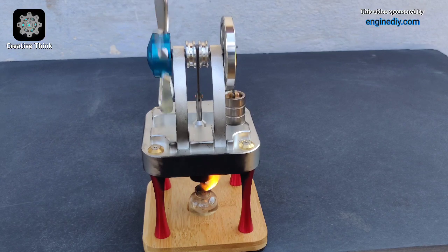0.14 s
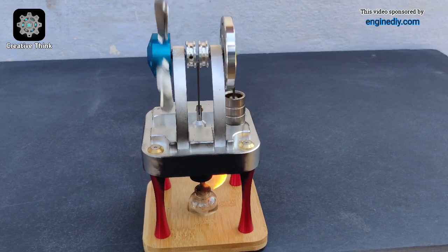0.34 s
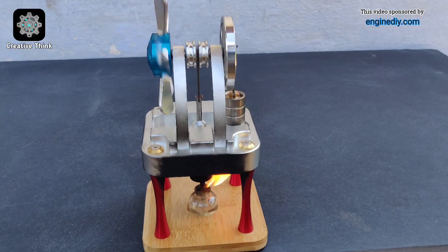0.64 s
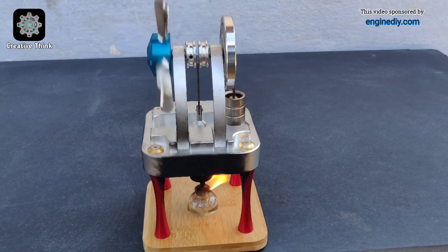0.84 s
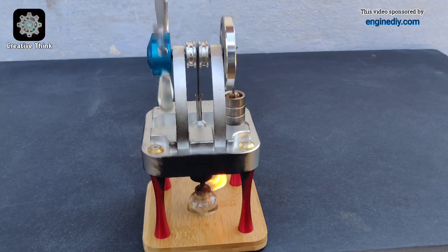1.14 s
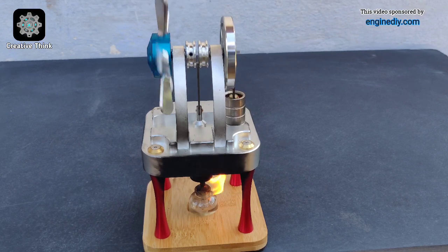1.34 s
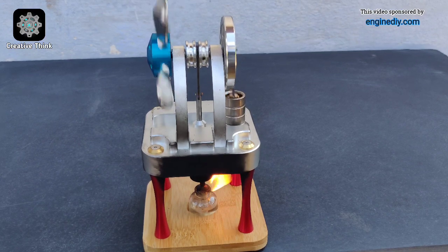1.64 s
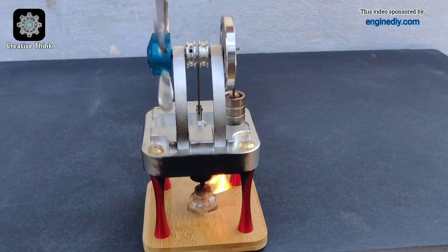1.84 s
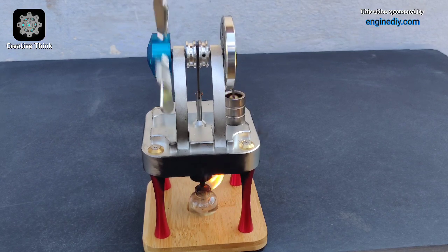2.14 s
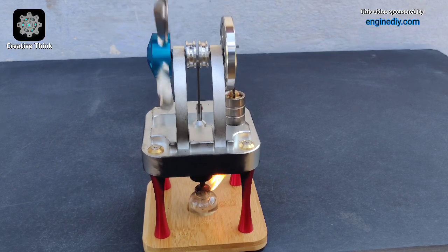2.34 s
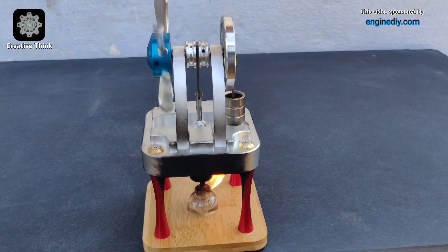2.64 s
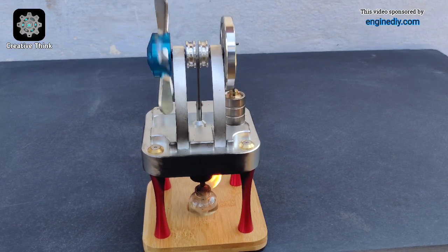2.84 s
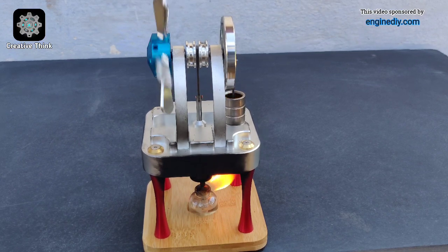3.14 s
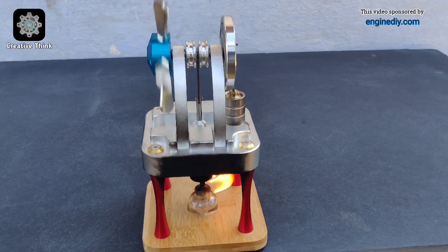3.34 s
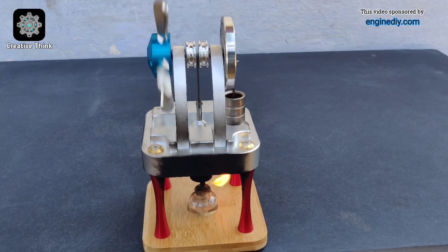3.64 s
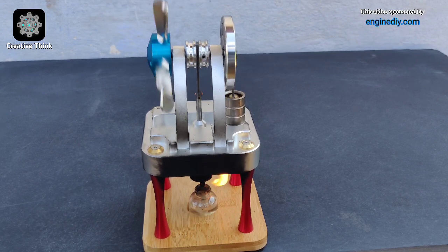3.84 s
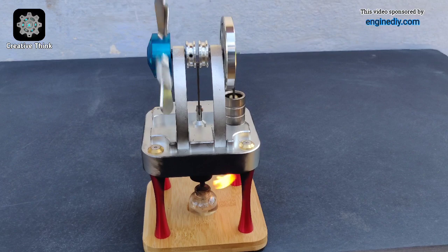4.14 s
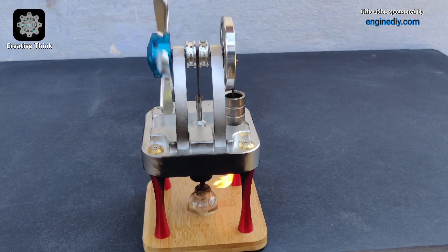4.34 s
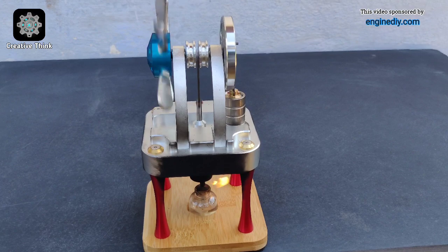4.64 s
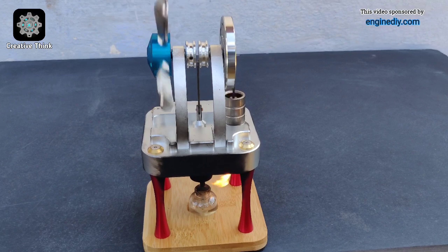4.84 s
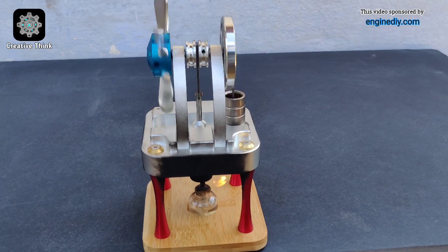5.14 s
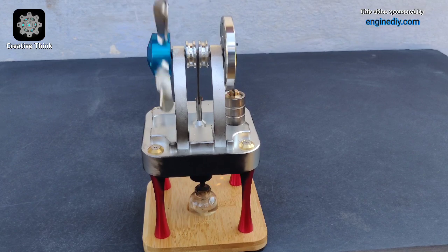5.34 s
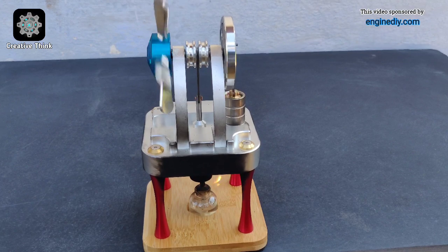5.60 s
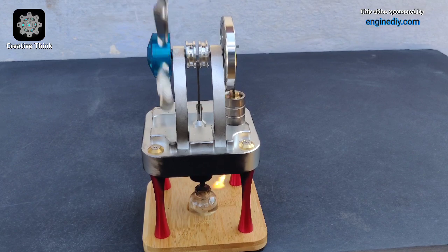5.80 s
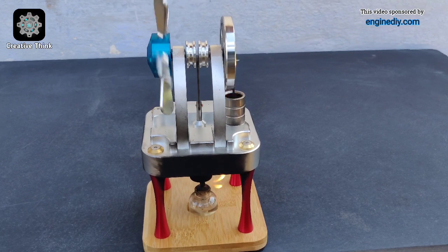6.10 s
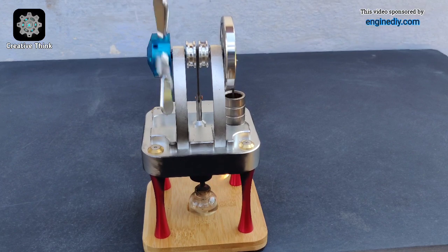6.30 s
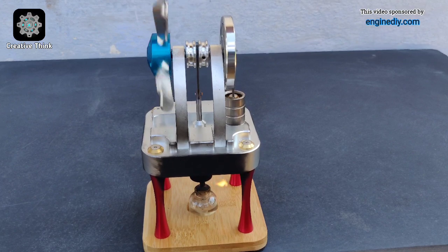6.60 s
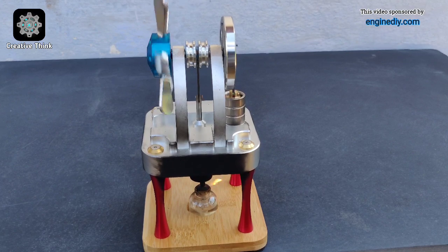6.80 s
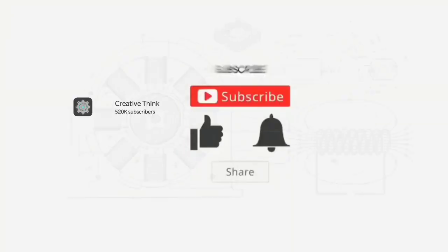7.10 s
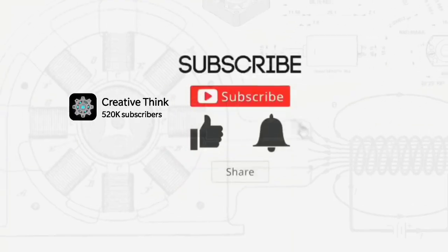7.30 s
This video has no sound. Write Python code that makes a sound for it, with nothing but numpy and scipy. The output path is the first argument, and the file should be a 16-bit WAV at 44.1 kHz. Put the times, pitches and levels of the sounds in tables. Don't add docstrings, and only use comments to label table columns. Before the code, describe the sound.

A small metal model engine clatters fast and evenly close by, slowing slightly, as wind starts buffeting the microphone before everything cuts off abruptly.

```python
import sys
import numpy as np
from scipy import signal
from scipy.fft import rfft, irfft, next_fast_len
from scipy.io import wavfile
from scipy.ndimage import uniform_filter1d

SR = 44100
rng = np.random.default_rng(int(sys.argv[2]) if len(sys.argv) > 2 else 0)


def boost_factor(decibels):
    exponent = np.asarray(decibels, float) / 20
    return 10 ** exponent


def master(y):
    cut = np.clip(np.atleast_2d(y).T, -1, 1)
    pcm = np.round(cut * 32767)
    wavfile.write(sys.argv[1], SR, pcm.astype(np.int16))


N = 328972
END_S = 6.9222


def unit(x):
    return x / np.sqrt(np.mean(x ** 2))


def curve(table, axis):
    rows = np.array(table)
    return np.interp(np.arange(N) / SR, rows[:, 0], rows[:, axis])


def colour(x, table, axis):
    rows, size = np.array(table), next_fast_len(N)
    hz = np.arange(size // 2 + 1) * SR / size + 1
    gain_db = np.interp(np.log(hz), np.log(rows[:, 0]), rows[:, axis])
    return irfft(rfft(x, size) * boost_factor(gain_db), size)[:N]


def ring(x, hz, t60):
    radius = np.exp(-np.log(1000) / (t60 * SR))
    return signal.lfilter([2 * (1 - radius)], [1, -radius * np.exp(2j * np.pi * hz / SR)], x)


def walk(rate):
    hold = int(SR / rate)
    steps = np.repeat(rng.standard_normal(N // hold + 1), hold)
    return unit(uniform_filter1d(uniform_filter1d(steps, hold), hold)[:N])


# [f/Hz, left level/dB, right level/dB]
HISS_SPECTRUM = [(299.5, -19.5, -16), (594, -16.5, -21), (1300, -19.5, -21), (2000, -24, -27),
                 (3350, -22.5, -24.5), (4130, -9.5, -14.5), (5130, -20.5, -26.5), (5930, -3, -14),
                 (6850, -11, -23), (8600, -36.5, -26), (9800, -51, -46), (11300, -48, -47),
                 (13050, -44.5, -40.5), (14200, -39.5, -37), (15400, -35.5, -35.5), (16200, -75, -75)]
# [f/Hz, level/dB rms, width/Hz, right minus left/dB]
FAR_TONES = [(45.5, -51, 4.1, -3), (84.8, -53.5, 4.7, 0), (111, -54.5, 4, -0.5), (406.3, -71.5, 3, 1.5),
             (484, -84.5, 4, -2), (13744, -73, 5, 11.5), (14080, -73, 5, 9), (14150, -72.5, 5, 7.5)]
# [t/s, level/dB]
WHINE_SWELL = [(0, 0), (1.9, -.7), (2.2, 4), (2.8, 1.5), (3.0, -1.5), (4.4, 0), (4.6, 3), (4.85, -3.5),
               (5.1, 0.5), (5.5, -1.5), (6.92, -3)]


def surroundings():
    common, left, right = rng.standard_normal((3, N))
    bass = signal.sosfilt(signal.butter(1, 1500, fs=SR, output="sos"), common)
    hiss = [colour(own + 1.35 * bass, HISS_SPECTRUM, axis=k + 1) for k, own in enumerate((left, right))]
    out = boost_factor(-27.0) * np.array(hiss)
    for hz, db, width, right_db in FAR_TONES:
        swell_db = curve(WHINE_SWELL, axis=1) * (hz > 10000)
        tone = unit(ring(rng.standard_normal(N), hz, 2.0 / width).imag)
        out += boost_factor(db + swell_db) * tone * boost_factor([[-right_db / 2], [right_db / 2]])
    return out


# [t/s, level/dB]
BREEZE_LEVEL = [
    (0.0, -62),
    (2.4, -58),
    (3.4, -42),
    (4.3, -42),
    (5.2, -43.5),
    (5.6, -33),
    (6.1, -32.5),
    (6.5, -32),
    (6.92, -29.5),
]
# [t/s, level above the breeze/dB, length/s]
GUST_EVENTS = [
    [(3.78, 5.5, .1), (4.14, 2.5, 0.16), (4.92, 4, 0.1), (5.43, 3, 0.059), (5.65, 2, 0.08), (5.995, 5.5, 0.014), (6.09, 4, 0.046), (6.2, 5, 0.087), (6.335, 5, 0.018), (6.41, -5.5, .04), (6.635, 5, 0.031), (6.73, -4, 0.022), (6.84, -1.5, .05)],
    [(4.75, 5.5, 0.079), (5.8, 4.5, 0.056), (6.09, 3, .05), (6.33, 6, .06), (6.6, 5.5, .09), (6.79, 3.5, 0.05), (6.86, 6, 0.04)],
]
# [f/Hz, level/dB per Hz]
BUFFET_SPECTRUM = [(5.9, -30.5), (10, 3), (27, 3.5), (62, -3), (134, -18), (160, -15), (449, -44),
                   (700, -40), (910, -75), (1540, -120)]
# [f/Hz, level/dB per Hz]
RUSH_SPECTRUM = [(120, -27.5), (220, 0), (350, -8.5), (600, -18.5), (1000, -42)]


def breeze():
    out, t = [], np.arange(N) / SR
    for table, side_db in zip(GUST_EVENTS, (8.5, 0)):
        gust_db = sum(db * np.exp(-((t - s) / length) ** 2) for s, db, length in table)
        air = unit(colour(boost_factor(3.0 * walk(25)) * rng.standard_normal(N), BUFFET_SPECTRUM, axis=1))
        rush = unit(colour(boost_factor(5.6 * walk(70)) * rng.standard_normal(N), RUSH_SPECTRUM, axis=1))
        wind = boost_factor(gust_db) * air + boost_factor(-29.5 + 2.2 * gust_db) * rush
        out.append(boost_factor(curve(BREEZE_LEVEL, axis=1) + side_db) * wind)
    return np.array(out)


# [t/s, peak level/dB, width/ms (negative for a pull)]
EDDIES = [
    [(5.441, -10.5, 7.5), (5.638, -10.5, -8), (5.955, -17, -17), (6.012, -15, -2), (6.027, -8, 16.5), (6.06, -13.5, -3.5), (6.073, -15.5, -2), (6.094, -16, 3), (6.11, -8.5, -10), (6.146, -12.5, 3.5), (6.168, -10, 4.5), (6.19, -17, -3.5), (6.209, -10, 4), (6.285, -14, 3.5), (6.316, -5.5, 5), (6.331, -14, -3), (6.342, -16, 2.5), (6.454, -17, -5), (6.617, -15, 5), (6.633, -11, -2), (6.649, -11, -4), (6.668, -20, 2.5), (6.76, -8.5, 5), (6.69, -16.5, 8), (6.833, -13, 6), (6.846, -13.5, -8), (6.902, -18, -3.5)],
    [(5.811, -24, 3), (6.323, -21, -9), (6.336, -23, 5.7), (6.783, -22, -4.5), (6.8, -14, 5), (6.914, -18.5, 2.5)],
]


def puffs():
    out, t = np.zeros((2, N)), np.arange(N) / SR
    for port, table in enumerate(EDDIES):
        for s, db, ms in table:
            near = slice(int((s - .06) * SR), int((s + .06) * SR))
            u = (t[near] - s) / (1.17 * ms / 1000)
            point = 1.57 * np.exp(-3.0 * (u * u + 0.018) ** 0.8)
            dips = 0.23 * np.exp(-.3 * u * u)
            out[port, near] += np.sign(ms) * boost_factor(db) * (point - dips)
    return out


# [t/s, rate/turns per s]
CRANK_SPEED = [
    (.005, 12.134),
    (1.005, 11.9327),
    (2.005, 11.9006),
    (3.005, 11.8252),
    (4.005, 11.6292),
    (5.005, 11.4123),
    (6.005, 11.0056),
    (7.005, 10.5078),
]


def crank():
    first_knock_s = .0142
    return 1 + np.cumsum(curve(CRANK_SPEED, axis=1)) / SR - first_knock_s * CRANK_SPEED[0][1]


# [t/s, level/dB]
WHISTLE_LEVEL = [
    (0.0, -45.5),
    (3.5, -49),
    (6.92, -50.5),
]
# [f/Hz, width/Hz, level/dB]
CAVITIES = [(931.2, 12.2, -2), (951.8, 17, -5.5), (1012.5, 19, -11)]


def whistle(turns):
    reversal_turn, reversal_width, reversal_db = .61, 0.21, -6.5
    flow = boost_factor(reversal_db * np.exp(-((turns % 1 - reversal_turn) / reversal_width) ** 2))
    air = np.zeros(N)
    for hz, width, db in CAVITIES:
        t60 = 1.5 / width
        air += boost_factor(db) * unit(ring(ring(rng.standard_normal(N), hz, t60), hz, t60).imag)
    steady = unit(air / uniform_filter1d(air ** 2, int(.12 * SR)) ** 0.34)
    return steady * unit(flow) * boost_factor(curve(WHISTLE_LEVEL, axis=1)) * boost_factor([[.7], [-.7]])


# [multiple of the turn rate, level/dB rms, slope/dB per turn per s lost]
SHAFT_ORDERS = [(12.93, -55.5, -8.5), (14, -58.5, -12.5), (15.12, -49, 2.5), (15.96, -53.5, 3.5),
                (16.99, -55, -1.5), (18.25, -56, 7.5), (19.1, -68, 10.5), (19.2, -69, 3.5),
                (21.15, -64, -1), (21.97, -65.5, -1), (23.12, -65, 5.5)]


def shaft(turns):
    lost = np.minimum(12 - curve(CRANK_SPEED, axis=1), .8)
    hum = np.zeros(N)
    for order, db, slope_db in SHAFT_ORDERS:
        phase = 2 * np.pi * (order * turns + order ** 2 / 4)
        level = boost_factor(db + slope_db * lost + 0.8 * walk(5))
        hum += level * np.sin(phase + 0.48 * walk(4))
    return np.sqrt(2) * hum * boost_factor([[1.2], [-1.2]])


# [t/ms, level/dB, scatter/ms]
MAIN_CONTACTS = [
    (-3.9, -13, 0.13),
    (-1.24, 0.5, 0.013),
    (2, -9.5, 0.23),
    (3.5, -27, 0.54),
]
RATTLE_CONTACTS = [
    (-1.03, -4, 0.37),
    (1.5, -6, .8),
    (3, -15, 1.1),
    (8, -22, 0.6),
]
RETURN_CONTACTS = [
    (-2.5, -0.5, 0.021),
    (0.5, -5.5, 0.34),
    (3.5, -18, 0.68),
    (10.5, -22, 3),
]
TAP_CONTACTS = [
    (-1.04, -1, 0.38),
    (2.5, -5, 0.75),
    (-5.5, -11.5, 1.1),
    (10, -16.5, 5.9),
    (16, -16.5, 2.2),
]
KNOCK_SCATTER = (0.63, 1.1, 1.3, 0.96)
KNOCK_SLOWING = (0.94, -1.2, 0.94, -0.29)
# [t/s, main knock level/dB, rattle level/dB, return level/dB]
TURN_LEVELS = [(0.014, 1.5, 4, -3.5), (0.179, -1, 1, 0.5), (0.262, -0.5, 1.5, -5.5), (0.511, 0, 0.5, -4),
               (0.594, 0.5, 1, -1), (0.677, 1.5, -1.5, 0), (0.844, -3.5, 1, -0.5), (0.928, 0.0, -5, 2.5),
               (1.095, -2.5, 2.5, -2.5), (1.179, 0.5, 5.5, -3.5), (1.263, -7, 1, -3), (1.431, 1, 2, 0),
               (1.515, 1.5, -3, -0.5), (1.599, 0.5, 1.5, 3), (1.683, 0.5, 3.5, 0.5), (1.767, 0, 2, 2),
               (1.935, -0.5, 2, -3.0), (2.019, -1, 0.5, -6), (2.103, 1.5, -1.5, 2),
               (2.187, -2.5, -2.5, 2), (2.355, 0, 1, 2.5), (2.439, 1, 1.5, 1.5), (2.692, 1, -2, 1.5),
               (2.777, 1.5, 2.5, 0), (2.861, 1.5, -1, -2), (2.946, -2, -1, 1), (3.03, -2.5, 0.5, 2),
               (3.115, -0.5, -2, 0), (3.37, -1.5, -0.5, 2), (3.455, -1, -4, 3), (3.54, -0.5, -0.5, -3),
               (3.797, -1, 0, -2), (3.882, -0.5, 1.5, -2.5), (4.14, 0.5, 3.5, -4), (4.227, 1.5, 1, 1.0),
               (4.4, -1, 2.5, 0), (4.573, -1.5, -7, 1.5), (4.834, 1, 0.5, 0), (5.185, -1.5, 0.5, 2.5),
               (5.274, 0, -0.5, -1.5), (5.451, 0, 0, 1), (5.81, -0.5, 0.5, 2.5), (5.9, -1.5, 1.5, -0.5),
               (6.082, -1, -4, 0), (6.265, -0.5, -0.5, -1.5), (6.357, -1.5, -4, -1.5),
               (6.449, -1, -1.5, 0), (6.542, -1, -5, -0.5), (6.636, -1, -8, -2.5), (6.824, -0.5, 0, -2.5),
               (.097, -0.5, -1, -0.5), (.345, 0, -0.5, 0), (.428, -2, 1, -0.5), (.761, -1, 1, -.7),
                (1.012, 0.4, 3, -0.5), (1.347, -0.5, 3, 0), (1.851, -0.5, -1, 0), (2.271, -0.5, 2.5, 0.5),
                (2.524, 1, -2, -0.5), (2.608, -1, -0.5, 1), (3.2, -0.5, 0, 1), (3.285, -0.3, -0.5, -0.5),
                (3.625, -0.5, 0.5, 0.9), (3.711, 0, 1.5, -0.2), (3.968, -0.5, -1, 1.5),
                (4.054, -2.5, 0.5, 1), (4.313, -0.1, 1.5, -0.5), (4.486, 1.5, -1.5, 1), (4.66, 1, 0, -1.4),
                (4.747, 0.9, -0.2, 0), (4.922, -0.4, 0, 0), (5.009, -1, 2.5, 1), (5.097, -0.5, 1.5, 1.5),
                (5.362, -0.5, 0.9, -1), (5.54, 1, 2, -0.5), (5.63, -0.5, -0.5, -2), (5.72, .7, 2, 2),
                (5.991, 0.2, -2, 0.5), (6.173, -1, -1.5, 2), (6.729, 0, -5.5, -1.5)]
# [t/s of their turn, level/dB]
UNUSUAL_TAPS = [(.1, 3.5), (.26, 2), (.34, -3), (.51, -3.5), (1.01, 3), (1.1, -3.5), (1.26, -1), (1.51, -5),
                (1.77, -3), (1.85, 2.5), (2.27, 3), (2.44, 4.5), (2.52, 2), (2.61, -6), (2.69, 3),
                (2.86, 2), (3.2, -4), (3.37, 2.5), (3.45, -2.5), (3.54, 3), (3.63, 4), (3.71, -2.5),
                (3.88, 4.5), (3.97, 1.5), (4.23, 2.5), (4.4, -3), (4.66, -6), (5.36, -5), (5.54, -6.5),
                (5.9, 4), (5.99, -5), (6.36, -5.5), (6.54, -3), (6.64, -1), (6.73, -1.5), (6.82, -1)]


def contacts(turns):
    rattle_turn, return_turn, tap_turn = .148, .411, .645
    return_later = 0.0089
    uneven_ms = .2
    t = np.arange(N) / SR
    whole = np.arange(1, int(np.interp(END_S, t, turns)) + 1)
    luck = rng.standard_normal((len(whole), 5)).T
    s = np.interp(whole, turns, t) + uneven_ms / 1000 * luck[4]
    period = np.gradient(s)
    lost = 12 - 1 / period
    return_s = s + (return_turn + return_later * lost) * period
    starts = s, s + rattle_turn * period, return_s, s + tap_turn * period

    levels = np.array(KNOCK_SCATTER)[:, None] * luck[:4] + np.outer(KNOCK_SLOWING, lost)
    for when, *knock_db in TURN_LEVELS:
        levels[:3, np.argmin(abs(s - when))] = knock_db
    for when, tap_db in UNUSUAL_TAPS:
        levels[3, np.argmin(abs(s - when))] = tap_db

    rows = []
    for kind, knock in enumerate((MAIN_CONTACTS, RATTLE_CONTACTS, RETURN_CONTACTS, TAP_CONTACTS)):
        for ms, db, scatter_ms in knock:
            chance = rng.standard_normal((len(s), 2)).T
            at = starts[kind] + (ms + scatter_ms * chance[0]) / 1000
            bounce_db = np.clip(3.25 * scatter_ms * chance[1], -12, 5)
            gain = boost_factor(levels[kind] + db + bounce_db)
            rows.append((np.clip(at * SR, 0, N - 1), gain, np.full(len(s), kind)))
    at, gain, kind = np.concatenate(rows, axis=1)
    return (at.astype(int), gain, kind.astype(int)), (starts, levels)


# [t/ms, level/dB]
SLACK_TICKS = [
    [(-3.5, 1.5), (-2.06, 0.5), (0.8, -11)],
    [(-2.5, -8), (-0.5, -6.5)],
]
# [f/Hz, left level/dB, right level/dB]
TICK_SPECTRUM = [(601, -26.5, -27), (980, -12.5, -15.5), (1640, -11, -16), (2800, -13.5, -16),
                 (4200, -10.5, -19.5), (5200, -15.5, -25.5), (8500, -33.5, -23.5), (10500, -56, -49),
                 (12500, -41.5, -34.5), (15400, -38.5, -31.5), (16300, -58.5, -55)]


def ticks(starts, levels):
    clicks = np.zeros(N)
    for start, level_db, table in zip(starts, levels, SLACK_TICKS):
        for ms, db in table:
            chance = rng.standard_normal((len(start), 2)).T
            at = np.clip((start + (ms + .12 * chance[0]) / 1000) * SR, 0, N - 1).astype(int)
            np.add.at(clicks, at, boost_factor(db + 0.32 * level_db + 0.5 * chance[1]))
    left = colour(clicks, TICK_SPECTRUM, axis=1)
    right = colour(np.roll(clicks, shift=-2), TICK_SPECTRUM, axis=2)
    return np.array([left, right])


# [f/Hz, left level/dB, right level/dB]
SNAP_SPECTRUM = [(593, -17, -16.5), (1553, -17, -17), (2450, -2.5, -6), (3200, -9.5, -12.5), (4730, -1, -4),
                 (5730, 6, -11), (5660, 17, -10.5), (6170, 1.5, -10.5), (8700, -19, -6), (9730, -44, -14.5),
                 (11800, -51, -48), (11960, -33, -26), (15400, -24, -15.5), (16000, -56.5, -46.5)]


def snap(at, gain, kind):
    blows = np.zeros(N)
    np.add.at(blows, at, gain * boost_factor([-3, -7.5, -5.0, -10.5])[kind])
    t = np.arange(1500) / SR
    decay = 1.02 * np.exp(-t / 0.0016) + boost_factor(-14) * np.exp(-t / 0.011)
    onset = 1 - np.exp(-t / 0.00015)
    swell = signal.fftconvolve(blows, decay * onset)[:N]
    common, left, right = rng.standard_normal((3, N))
    burst = [colour(swell * (common + 1.83 * own), SNAP_SPECTRUM, axis=k + 1)
             for k, own in enumerate((left, right))]
    return boost_factor(-22.0) * np.array(burst)


# [f/Hz, sense at the contact, right lag/rad]
BASE_MODES = [(1320, 1, -.2), (1830, -1, .6), (2250, 1, .5), (2460, -1, .4), (2850, 1, 1.2),
              (4060, -1, 2.8), (4230, 1, 2), (4320, -1, 1.4), (4540, 1, -.6), (4690, -1, -1.2),
              (4970, 1, .4)]
LINKAGE_MODES = [(5560, -1, 2.8), (5750, 1, 1.2), (5900, 1, 2), (6150, 1, -1.6), (6400, -1, 3.1),
                 (6700, 1, -.6), (7300, -1, -1), (7700, 1, -2), (8750, -1, .4), (9400, 1, -.3)]
# [t60/s, right minus left/dB, then level/dB for sliding, main knock, rattle, return, tap]
BASE_DRIVE = [(0.014, -4.5, -29, -5, -11.5, -17.5, -23.5), (0.022, -2.5, -20.5, 0.5, -5.5, -14, -6),
              (0.018, -7.5, -26.5, 6, -14, -17, -18), (0.037, 0.5, -21.5, 4, -9, -3.5, -4),
              (0.046, 0.5, -12.5, -13, -11.5, -11.5, -8.5), (0.015, 6, -18.5, 3, 0, -4.5, -1),
              (0.032, -5.5, -16.5, 11.5, 5.5, 5.5, 10), (0.052, -5, -21, 3.5, -1, 1, -1),
              (.03, -5, -24.5, -2, -7, -6.5, -5.5), (0.068, -3, -24, -10, -8, -8.5, -12.5),
              (0.013, -8, -13.5, 12, 2.5, -4.5, -13)]
LINKAGE_DRIVE = [(0.012, -8.5, -11, 20.5, 11.5, 10, -7.5), (0.037, -10, -2.5, 25, 16, 21.5, -8),
                 (0.021, -3, -9.5, 9.5, 7, 12, -3), (0.018, -13.5, -2, 25.5, 5.5, 24.5, -3),
                 (0.0079, -17.5, -6.5, 10, -2, 16.5, 4), (0.011, -6.5, -20, 11.5, -9, 7, -2),
                 (0.012, 3, -27, -2, -12.5, 2.5, -12.5), (0.022, 8.5, -33, -11, -20, -7.5, -23),
                 (0.01, 24.5, -52, -31.5, -18, -30.5, -28), (0.025, 24.5, -52.5, -38, -32, -39.5, -30.5)]


def frame(at, gain, kind):
    out = np.zeros((2, N))
    scrape = boost_factor(-26.0 + 4.9 * walk(60))
    spread_db = np.array([1.9, 1.8, 1.8, 3.5])[kind]
    for mode, drive in zip(BASE_MODES + LINKAGE_MODES, BASE_DRIVE + LINKAGE_DRIVE):
        hz, sense, lag = mode
        t60, right_db, slide_db, *kind_db = drive
        force = boost_factor(slide_db) * scrape * rng.standard_normal(N)
        share = sense * boost_factor(spread_db * rng.standard_normal(len(at)))
        np.add.at(force, at, gain * share * boost_factor(kind_db)[kind])
        z = ring(ring(force, hz, 0.0034), hz, t60) / 2
        out += [z.imag, boost_factor(right_db) * (z * np.exp(-1j * lag)).imag]
    return out


def scene():
    turns = crank()
    hits, knocks = contacts(turns)
    engine = frame(*hits) + snap(*hits) + ticks(*knocks) + shaft(turns) + whistle(turns)
    return engine + surroundings() + breeze() + puffs()


# [f/Hz, share of the time]
DROPOUT_SHARE = [(1500, 0), (2600, 0), (3300, .03), (4000, 0), (7900, 0), (9200, .1), (10000, .4),
                 (11300, .7), (12600, .5), (13300, .35), (14100, .04), (15000, .25), (16000, .65)]


def dropouts(x):
    bins, whim_db, drop_db = 16, 4.5, -35
    hz, _, z = signal.stft(x, SR, "cosine", nperseg=1024)
    bands = z[:, :512].reshape(2, -1, bins, z.shape[2])
    db = 10 * np.log10(np.sum(abs(bands) ** 2, axis=(0, 2)) + 1e-20)
    whim = whim_db * 2 * rng.standard_normal(db.shape)
    db = db + uniform_filter1d(uniform_filter1d(whim, size=2, axis=0), size=2, axis=1)
    live = db[:, :int(END_S * SR / 512)]
    share = np.interp(hz[bins // 2:512:bins], *np.array(DROPOUT_SHARE).T)
    sill = np.sort(live)[np.arange(len(live)), (share * live.shape[1]).astype(int)]
    gate = np.repeat(np.where(db < sill[:, None], boost_factor(drop_db), 1), bins, axis=0)
    gate = np.vstack([gate, gate[-1:]])
    return signal.istft(z * gate, SR, "cosine", nperseg=1024)[1][:, :N]


def top_cut(x):
    return signal.sosfilt(signal.butter(12, 16790, fs=SR, output="sos"), x)


# [f/Hz, level/dB]
PORT_RESPONSE = [(9000, -0.5), (10200, -3), (11300, -1), (12300, -1.5), (13500, 2.5), (15800, 1.5),
                 (16700, -11)]


def record(dry):
    duck_from_db, duck_slope, memory_s = -20.5, 0.25, 0.44
    fade = np.clip((END_S - np.arange(N) / SR) / 0.00096, 0, 1)
    heard = np.array([colour(port, PORT_RESPONSE, axis=1) for port in dry])
    keep = np.exp(-1 / (memory_s * SR))
    power = signal.lfilter([1 - keep], [1, -keep], np.max(heard ** 2, axis=0))
    loud_db = 10 * np.log10(power + 1e-12)
    heard = heard * boost_factor(-duck_slope * np.maximum(loud_db - duck_from_db, 0))
    return top_cut(dropouts(heard) * fade)


dry = scene()
out = record(dry)
master(out)
```